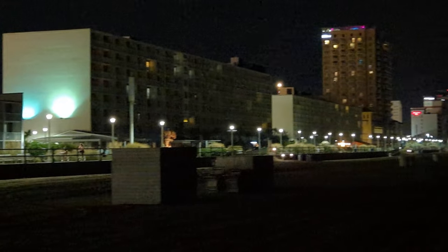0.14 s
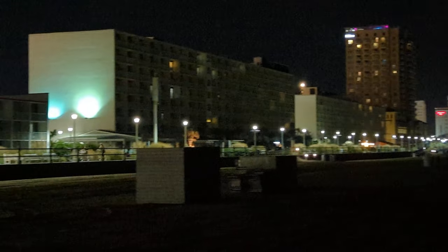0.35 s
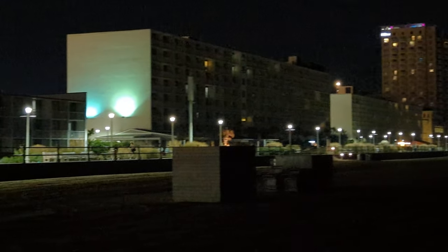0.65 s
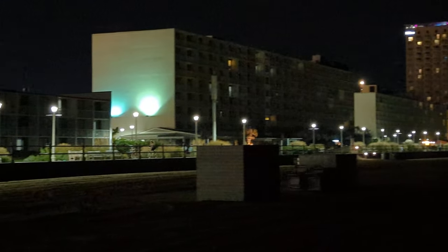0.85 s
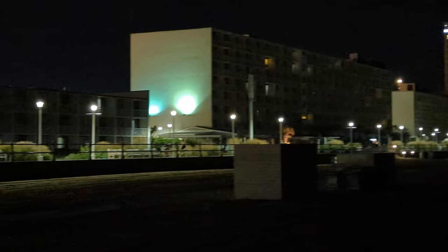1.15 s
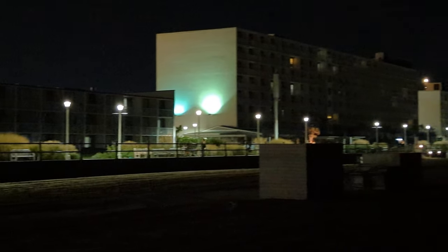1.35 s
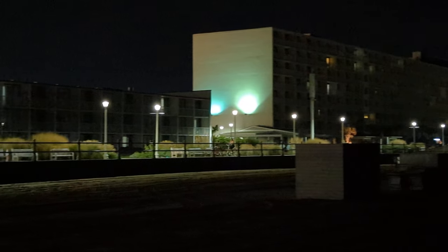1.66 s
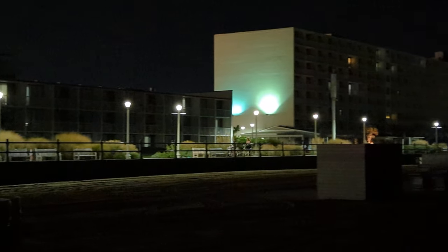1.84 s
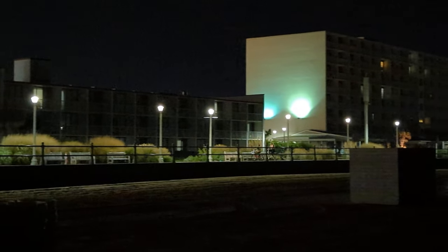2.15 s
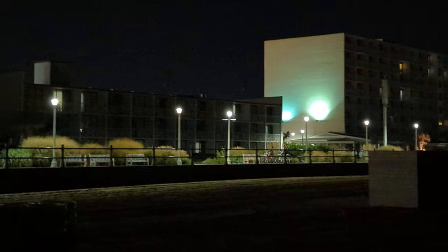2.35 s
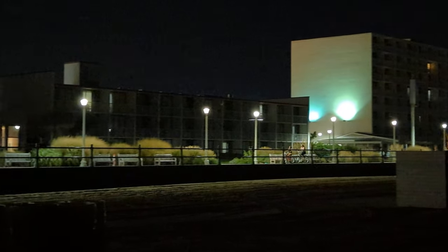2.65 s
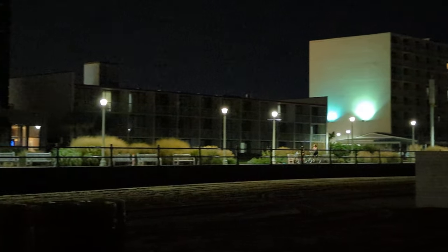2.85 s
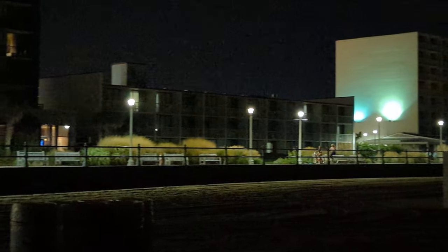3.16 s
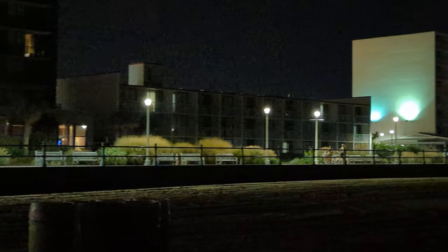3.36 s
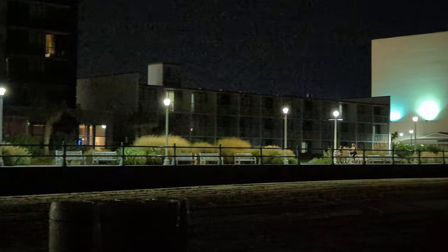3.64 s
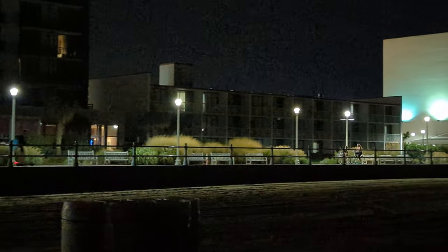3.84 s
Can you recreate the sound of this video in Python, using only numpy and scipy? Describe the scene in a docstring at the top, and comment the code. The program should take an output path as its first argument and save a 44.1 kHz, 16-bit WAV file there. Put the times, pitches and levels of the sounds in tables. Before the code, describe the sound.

Wind rumbles on the microphone, lightly at first, over a faint, steady wash of distant surf. A few soft thumps come around 1 second. From about 1.5 seconds, deep gusts buffet both sides with flutter, thumps and short rasps, easing slightly after 2 seconds and hitting hard again from 3 seconds. A tiny handling tick comes near 2.8 seconds, and a faint airy rush builds toward 4 seconds.

```python
"""Wind gusts buffet the two microphone ports of a camera on a beach front at night.
Each port has its own deep rumble and fluttering eddies. Single large eddies thump, and in
hard gusts the airflow tears and breaks away in short rasps; an airy rush builds at the end.
Behind: distant surf with foam and swells, a low rumble of surf and town, a thin hiss,
and a few tiny handling ticks from the camera body."""
import sys
import numpy as np
from scipy.fft import rfft, irfft, next_fast_len
from scipy.io import wavfile
from scipy.ndimage import uniform_filter1d, map_coordinates

SR = 44100
rng = np.random.default_rng(int(sys.argv[2]) if len(sys.argv) > 2 else 0)


def master_out(mix):
    """Clip the mix to full scale and print it as 16-bit PCM to the path in sys.argv[1]."""
    frames = np.transpose(np.atleast_2d(mix))
    ceiling = np.clip(frames, -1, 1)
    pcm = np.round(ceiling * 32767).astype(np.int16)
    wavfile.write(sys.argv[1], SR, pcm)


N = 176400

# Far rumble of surf and town. Each row: time in seconds, level in dB.
FAR_RUMBLE_DB = [(0, -41), (.3, -32.5), (.55, -40), (.75, -32), (.9, -39), (4, -39.5)]
# Its spectrum. Each row: frequency in Hz, relative density in dB.
FAR_RUMBLE_SPECTRUM = [(20, 1), (42, -9.5), (56, 5.5), (72, -4), (95, -10), (130, -14), (185, -16),
                       (260, -24), (400, -42), (1500, -120)]
# Thin top hiss at the left port. Each row: time in seconds, level in dB.
HISS_DB = [(0, -64.5), (.45, -62.5), (.75, -65), (1.0, -62.5), (1.17, -67.5), (1.35, -64.5), (1.6, -66),
           (2.5, -66.5), (2.72, -63.5), (2.95, -67.5), (3.15, -68.5), (3.42, -64), (3.7, -67), (4, -62.5)]
# Its spectrum. Each row: frequency in Hz, relative density in dB.
HISS_SPECTRUM = [(1000, -120), (5000, -11), (7000, -4), (8700, 0), (10300, -5.5), (11500, -15.5),
                 (13000, -39)]
# Swell of far waves. Each row: time in seconds, level in dB.
SWELL_DB = [(0, -69.5), (2.3, -62), (2.7, -55.5), (3.1, -57.5), (3.5, -53.5), (4, -52.5)]
# Its spectrum. Each row: frequency in Hz, relative density in dB.
SWELL_SPECTRUM = [(100, -120), (400, -10.5), (750, 1), (1200, -5.5), (2000, -15.5), (4500, -20.5),
                  (9000, -120)]
# Foam of a spent wave. Each row: frequency in Hz, relative density in dB.
FOAM_SPECTRUM = [(100, -120), (800, -27.5), (1500, -4), (1950, 1.5), (2400, -2), (3200, -10), (6000, -39),
                 (10000, -120)]
# Distant surf. Each row: time in seconds, level in dB.
SURF_DB = [(0, -45), (.4, -44.5), (1.0, -45), (1.5, -47), (2.2, -46.5), (2.75, -46.5), (3.2, -48),
           (3.6, -46), (4, -45)]
# Its spectrum. Each row: frequency in Hz, relative density in dB.
SURF_SPECTRUM = [(100, 8), (200, 11.5), (270, 10), (340, 6.5), (550, 3), (1000, -1.5), (1450, -3.5),
                 (1900, -3.5), (2900, -8.5), (4200, -9), (5200, -15), (6300, -21), (9000, -33),
                 (10300, -37.5), (12000, -47), (15000, -61)]
# Its width. Each row: frequency in Hz, left-right correlation.
SURF_CORRELATION = [(60, 0.85), (250, 1), (500, 0.98), (1100, 0.95), (1900, 0.56), (2300, 0.5),
                    (3100, 0.46), (4400, -0.11), (6000, -0.48), (8000, -0.28)]
# Its balance. Each row: frequency in Hz, left minus right in dB.
SURF_BALANCE_DB = [(400, -0.5), (1000, -2.5), (2000, -1.5), (2900, -1), (4200, 6.5), (5500, 8), (6500, 2),
                   (8500, 9.5), (11000, 20.5)]
# Handling ticks. Each row: start in seconds, envelope peak in dB, ring frequency in Hz.
TICKS = [(1.0492, -53, 7400), (1.0495, -51, 10800), (1.175, -54, 5700), (1.181, -49.5, 6000),
         (2.7815, -54, 9300), (2.789, -38.5, 4750), (2.7891, -48, 3200), (2.7893, -49, 8500),
         (2.795, -47, 10600), (3.473, -48, 4500)]
# Air rushing past the camera. Each row: time in seconds, level in dB.
RUSH_DB = [(3.0, -91), (3.3, -63), (3.7, -65), (3.86, -56), (4, -54)]
# Its spectrum. Each row: frequency in Hz, relative density in dB.
RUSH_SPECTRUM = [(400, -41), (1100, 2.5), (1800, -6), (4500, -7), (6000, -21), (12000, -61)]
# Airflow breaking away. Each row: start in seconds, length in seconds, level in dB,
# centre in Hz, port (0 left, 1 right).
RASPS = [(1.599, 0.022, -24, 170, 0), (1.628, 0.023, -20, 115, 1), (1.723, 0.02, -22, 180, 0),
         (1.74, 0.021, -25, 205, 1), (1.793, 0.019, -24.5, 200, 1), (1.795, 0.043, -21, 215, 0),
         (1.817, 0.0092, -20.5, 160, 1), (1.833, 0.0097, -26.5, 490, 0), (1.862, 0.016, -25.5, 210, 1),
         (1.91, 0.028, -19.5, 135, 0), (2.021, 0.015, -25, 210, 0), (2.145, 0.019, -26.5, 210, 0),
         (2.21, 0.02, -28.5, 215, 0), (2.335, 0.026, -19, 120, 0), (2.478, 0.024, -22, 131, 0),
         (2.55, 0.039, -26.5, 171, 0), (2.99, .018, -20, 165, 0), (3.026, 0.023, -29.5, 190, 1),
         (3.225, 0.033, -20, 165, 0), (3.275, 0.046, -25, 225, 1), (3.332, 0.011, -21.5, 250, 1),
         (3.354, 0.015, -24.5, 340, 1), (3.395, 0.04, -21, 165, 0), (3.583, .027, -25.5, 240, 1),
         (3.638, 0.016, -19.5, 205, 0), (3.656, 0.016, -30.5, 260, 1), (3.783, 0.011, -23, 215, 1),
         (3.826, 0.015, -22.5, 290, 1), (3.849, 0.015, -23.5, 175, 1), (3.922, 0.029, -23, 230, 1),
         (3.952, .012, -20.5, 340, 1)]
# Single large eddies. Each row: centre time in seconds, peak in dB, half-length in seconds,
# port (0 left, 1 right).
THUMPS = [(.073, -27, 0.0018, 0), (1.008, -20, 0.0032, 1), (1.047, -15.5, 0.0068, 0),
          (1.228, -19.5, 0.0038, 0), (1.605, -5, 0.0025, 1), (1.617, -7.5, 0.0026, 0),
          (1.727, -13.5, 0.0011, 0), (1.748, -8, 0.003, 1), (1.837, -6, 0.0038, 0), (1.879, -9, .003, 1),
          (2.214, -23, 0.00097, 0), (2.945, -10, 0.0034, 0), (3.008, -3.5, 0.003, 0),
          (3.132, -22, 0.00048, 1), (3.243, -9.5, 0.0032, 0), (3.2576, -14.5, 0.00052, 1),
          (3.422, -12, 0.002, 0), (3.647, -8, 0.0021, 0), (3.687, -8.5, 0.0022, 1),
          (3.829, -19, 0.00053, 1), (3.906, -13.5, 0.00059, 1), (3.933, -4.5, 0.0018, 1),
          (3.954, -16.5, 0.00039, 1)]
# Wind pressure at each port. Each row: time in seconds, level in dB.
RUMBLE_LEFT_DB = [(0, -35), (.08, -24.5), (.16, -41), (.38, -40), (.5, -41), (.85, -43), (1.05, -35),
                  (1.14, -37), (1.45, -22.5), (1.58, -19), (1.67, -22), (1.75, -16.5), (1.8, -17.5),
                  (1.89, -15.5), (2.04, -26), (2.36, -24.5), (2.43, -30), (2.47, -23), (2.74, -21),
                  (2.95, -13.5), (3.06, -22.5), (3.24, -15), (3.3, -23), (3.35, -23.5), (3.54, -17.5),
                  (3.64, -20.5), (3.71, -30), (3.8, -20), (4.0, -20.5)]
RUMBLE_RIGHT_DB = [(0, -35), (.36, -41), (.88, -45.5), (1.07, -26), (1.25, -41), (1.37, -26), (1.5, -41),
                   (1.63, -13.5), (1.69, -26.5), (1.74, -17.5), (1.8, -25.5), (1.87, -17), (1.97, -25.5),
                   (2.27, -24.5), (2.65, -30.5), (2.96, -26.5), (3.01, -14.5), (3.06, -32.5), (3.26, -11.5),
                   (3.33, -14.5), (3.4, -28), (3.55, -13), (3.6, -26), (3.64, -19.5), (3.76, -21.5),
                   (3.86, -13), (3.94, -14), (4.0, -14.5)]
# Small eddies at each port. Each row: time in seconds, strength in dB.
EDDIES_LEFT_DB = [(0.0, -62), (1.01, -64), (1.05, -44), (1.1, -55), (1.32, -33), (1.5, -32), (1.57, -28),
                  (1.66, -28.5), (1.7, -23), (1.78, -21), (1.87, -29.5), (1.99, -22), (2.04, -27),
                  (2.07, -23), (2.1, -25), (2.19, -23.5), (2.28, -23), (2.32, -28), (2.42, -34),
                  (2.46, -31.5), (2.53, -30), (2.59, -27), (2.7, -41.5), (2.77, -27.5), (2.83, -33),
                  (2.9, -26), (3.03, -27), (3.1, -36.5), (3.26, -24.5), (3.3, -35), (3.36, -23.5),
                  (3.48, -24), (3.6, -32), (3.7, -33), (3.77, -28), (3.84, -33), (3.9, -27.5), (4.0, -28)]
EDDIES_RIGHT_DB = [(0.0, -37), (0.09, -61), (0.98, -70), (1.012, -28), (1.06, -46.5), (1.54, -48),
                   (1.59, -25), (1.67, -40), (1.72, -39), (1.76, -26.5), (1.84, -35.5), (1.9, -39),
                   (1.96, -44), (2.08, -35.5), (2.28, -31.5), (2.34, -44), (2.43, -35), (2.6, -42.5),
                   (2.76, -34.5), (2.95, -50), (3.01, -32), (3.09, -32.5), (3.14, -30), (3.22, -28.5),
                   (3.31, -30), (3.38, -28), (3.44, -36.5), (3.55, -26), (3.62, -34), (3.69, -33),
                   (3.75, -31.5), (3.82, -27.5), (3.9, -21), (3.95, -24), (3.975, -44), (4.0, -17)]
# Wind spectra. Each row: frequency in Hz, relative density in dB.
RUMBLE_SPECTRUM = [(8, -23), (20, 2), (32, 7), (60, 1), (100, -4), (140, -17.5), (220, -29), (500, -102.5),
                   (1500, -120)]
EDDY_SPECTRUM = [(50, -18), (90, -1.5), (125, 4), (180, -3.5), (270, -10), (400, -17.5), (600, -27),
                 (1000, -47.5), (4000, -120)]
TEAR_SPECTRUM = [(150, -17.5), (300, 1), (450, -1.5), (700, -10), (1100, -12), (1600, -30), (3000, -82),
                 (6000, -120)]


def amp(db):
    """Decibels to gain."""
    return 10 ** (np.asarray(db) / 20)


def unit(x):
    """Scale to rms 1."""
    return x / np.sqrt(np.mean(x ** 2) + 1e-20)


def along(rows, hz):
    """Interpolate (Hz, value) rows on a log frequency axis."""
    row_hz, values = np.transpose(rows)
    return np.interp(np.log(hz + 1), np.log(row_hz + 1), values)


def curve(rows):
    """One value per sample from (seconds, value) rows."""
    return np.interp(np.arange(N) / SR, *np.transpose(rows))


def wobble(knots_per_s):
    """Smooth random curve."""
    return map_coordinates(rng.standard_normal(4096), [np.arange(N) * knots_per_s / SR], mode="mirror")


def filtered(x, response):
    """Filter x by the gain response(hz)."""
    size = next_fast_len(N + SR // 2)
    return irfft(rfft(x, size) * response(np.fft.rfftfreq(size, 1 / SR)), size)[..., :N]


def noise(spectrum):
    """Coloured noise of rms 1."""
    return unit(filtered(rng.standard_normal(N), lambda hz: amp(along(spectrum, hz))))


def noise_pair(spectrum):
    """Independent noise for each port."""
    return np.array([noise(spectrum), noise(spectrum)])


def steady_noise(spectrum, window_samples):
    """Coloured noise with its own swells levelled out."""
    x = noise(spectrum)
    power = uniform_filter1d(uniform_filter1d(x ** 2, window_samples), window_samples)
    return unit(x / np.sqrt(np.abs(power) + 1e-6))


def far_rumble():
    """Surf and town rumble far off, the same at both ports."""
    return amp(curve(FAR_RUMBLE_DB)) * steady_noise(FAR_RUMBLE_SPECTRUM, window_samples=4000)


def hiss(right_gain_db=-17.5):
    """A thin top hiss comes and goes, mostly on the left."""
    return amp(curve(HISS_DB)) * amp([[0], [right_gain_db]]) * noise_pair(HISS_SPECTRUM)


def swell():
    """Far waves build twice in the midrange, the same at both ports."""
    return amp(curve(SWELL_DB)) * noise(SWELL_SPECTRUM)


def foam(start_db=-51.5, fade_db_per_s=6.5):
    """The hiss of a spent wave dies away."""
    return amp(start_db - fade_db_per_s * np.arange(N) / SR) * noise_pair(FOAM_SPECTRUM)


def surf(waver_db=0.5):
    """A far, even wash: centred in the bass, wide in the treble, where the left port hears more."""
    def mid_side_gains(hz):
        angle = np.arccos(np.clip(along(SURF_CORRELATION, hz), -1, 1)) / 2
        return np.array([np.cos(angle), np.sin(angle)])

    def port_gains(hz):
        return amp(np.outer([.5, -.5], along(SURF_BALANCE_DB, hz)))

    mid, side = filtered(noise_pair(SURF_SPECTRUM), mid_side_gains)
    wash = filtered(np.array([mid + side, mid - side]), port_gains)
    return unit(wash) * amp(curve(SURF_DB) + waver_db * wobble(knots_per_s=5.09))


def handling_ticks(attack_s=.0003, t60_s=.0045, grit=.26, left_minus_right_db=12):
    """The camera body rings in tiny, quickly damped ticks near the left port."""
    out, t = np.zeros(N + SR), np.arange(2048) / SR
    envelope = (1 - np.exp(-t / attack_s)) * amp(-60 * t / t60_s)
    envelope /= envelope.max()
    for start_s, peak_db, ring_hz in TICKS:
        ring = np.sin(2 * np.pi * ring_hz * t) + grit * rng.standard_normal(len(t))
        out[round(start_s * SR):][:len(t)] += amp(peak_db) * envelope * ring
    return out[:N] * amp(np.array([[.5], [-.5]]) * left_minus_right_db)


def rush():
    """Air rushes past the camera as the wind picks up."""
    return amp(curve(RUSH_DB)) * noise_pair(RUSH_SPECTRUM)


def rasps(edge_s=.009, low_exponent=1.16, high_exponent=3):
    """Airflow breaks away from a port in rough bursts; the faster the jet, the higher the rasp."""
    out, t, hz = np.zeros((2, N + SR)), np.arange(4096) / SR, np.fft.rfftfreq(4096, 1 / SR)
    for start_s, length_s, level_db, centre_hz, port in RASPS:
        ratio = hz / centre_hz
        band = ratio ** low_exponent / (1 + ratio ** (low_exponent + high_exponent))
        ramp = np.clip(np.minimum(t, length_s + edge_s - t) / edge_s, 0, 1)
        gate = np.sin(np.pi / 2 * ramp) ** 2
        burst = gate * irfft(band * np.exp(2j * np.pi * rng.random(len(hz))))
        burst *= np.sqrt(length_s * SR / np.sum(burst ** 2))  # rms 1 over length_s
        onset = round((start_s - edge_s / 2) * SR)
        out[port, onset:][:len(t)] += amp(level_db) * burst
    return out[:, :N]


def thumps():
    """An eddy crosses a port: a quick suction, then a push; the smaller it is, the sharper the pop."""
    out, t = np.zeros((2, N)), np.arange(N) / SR
    for centre_s, peak_db, half_s, port in THUMPS:
        offset = np.sqrt(2) * (t - centre_s) / half_s
        out[port] += amp(peak_db) * offset * np.exp(np.sqrt(2) - np.hypot(1, offset))
    return out


def port_wind(rumble_rows, eddy_rows, tear_gain_db):
    """Wind on one port: puffs of pressure, fluttering eddies, and a spitting tear in hard gusts."""
    puff_depth_db, flutter_depth_db, spit_depth_db = 0.5, 3, 7.5
    eddy_gain_db, full_gust_db, tear_db_per_eddy_db = 0.5, -15.5, 1.56

    puffs = amp(puff_depth_db * wobble(knots_per_s=22))
    rumble = unit(puffs * steady_noise(RUMBLE_SPECTRUM, window_samples=2600))
    flutter = amp(flutter_depth_db * wobble(knots_per_s=50))
    eddies = unit(flutter * steady_noise(EDDY_SPECTRUM, window_samples=1600))
    spit = amp(spit_depth_db * wobble(knots_per_s=160))
    tear = unit(flutter * spit * noise(TEAR_SPECTRUM))

    rumble_db, eddy_db = curve(rumble_rows), curve(eddy_rows)
    tear_db = full_gust_db + tear_gain_db + tear_db_per_eddy_db * (eddy_db - full_gust_db)
    return amp(rumble_db) * rumble + amp(eddy_db + eddy_gain_db) * eddies + amp(tear_db) * tear


def scene():
    """Wind on both ports over the far shore and the ticks."""
    left = port_wind(RUMBLE_LEFT_DB, EDDIES_LEFT_DB, tear_gain_db=-18.5)
    right = port_wind(RUMBLE_RIGHT_DB, EDDIES_RIGHT_DB, tear_gain_db=-11.5)
    wind = np.array([left, right]) + thumps() + rasps()
    background = surf() + foam() + swell() + hiss() + far_rumble()
    return wind + background + handling_ticks() + rush()


def record(dry, rolloff_hz=11800, limit_hz=15700):
    """The microphone rolls off in the top octave and passes nothing above its band limit."""
    return filtered(dry, lambda hz: (hz < limit_hz) / np.sqrt(1 + (hz / rolloff_hz) ** 20))


dry = scene()
out = record(dry)
master_out(out)
```